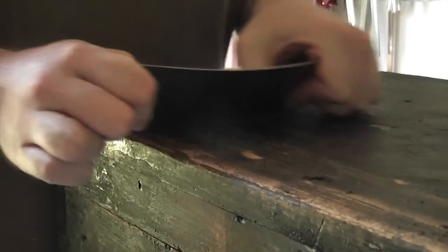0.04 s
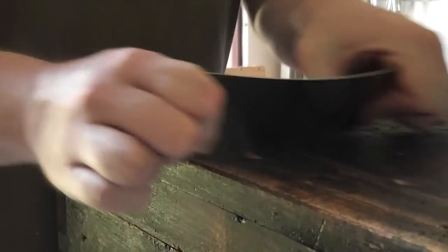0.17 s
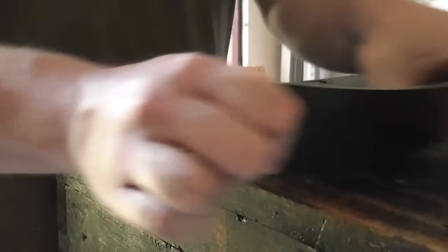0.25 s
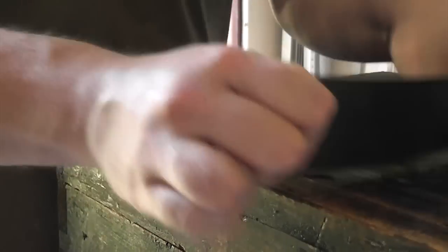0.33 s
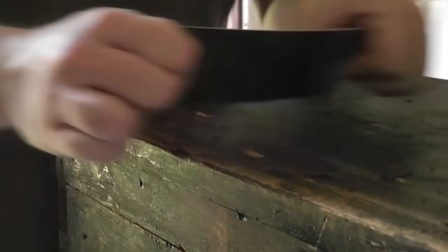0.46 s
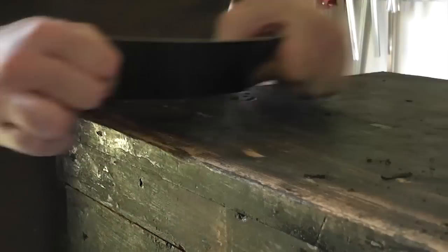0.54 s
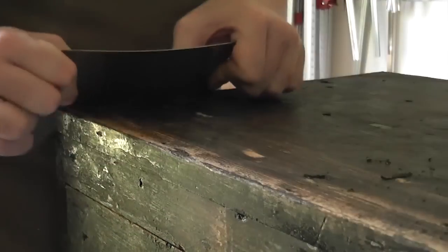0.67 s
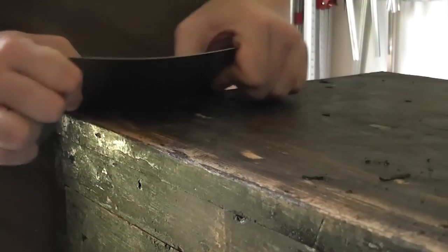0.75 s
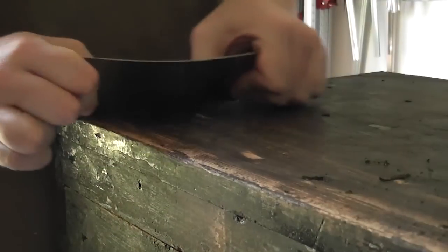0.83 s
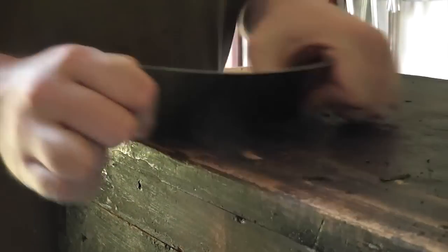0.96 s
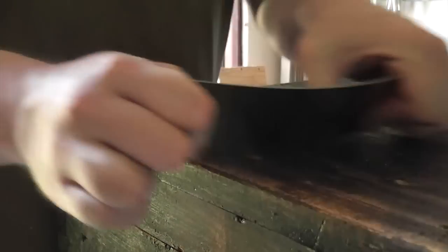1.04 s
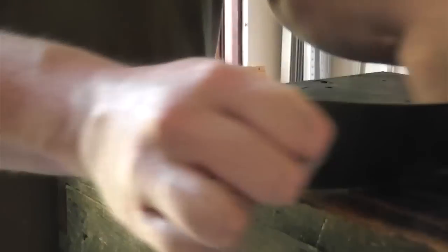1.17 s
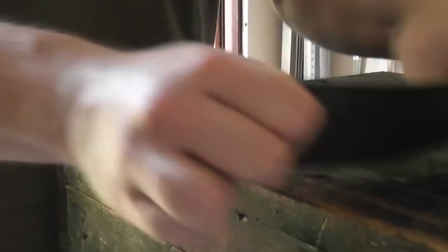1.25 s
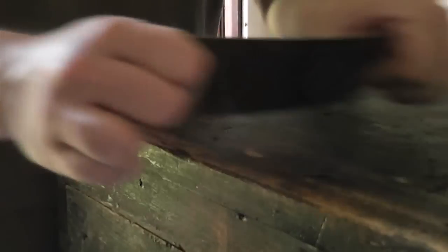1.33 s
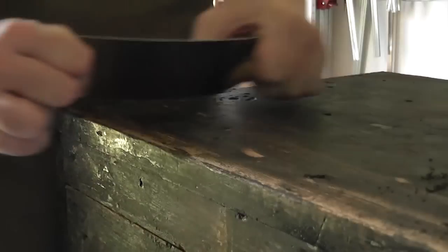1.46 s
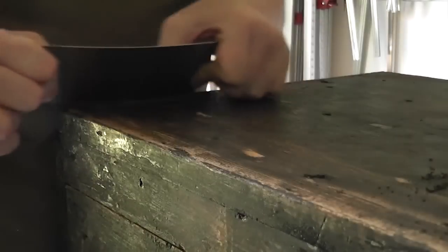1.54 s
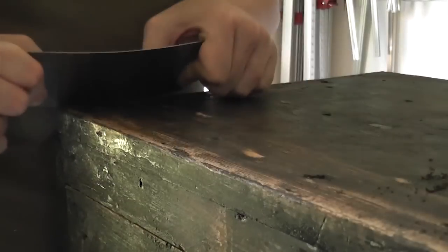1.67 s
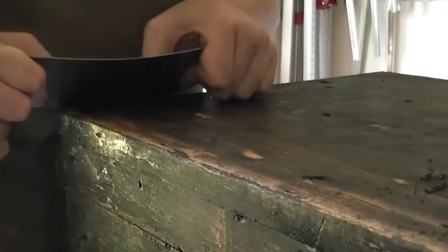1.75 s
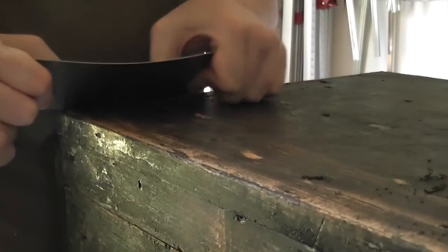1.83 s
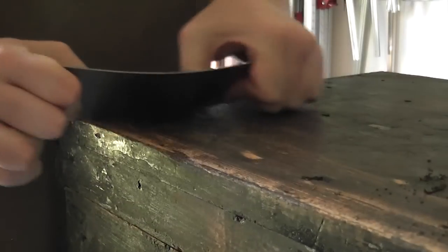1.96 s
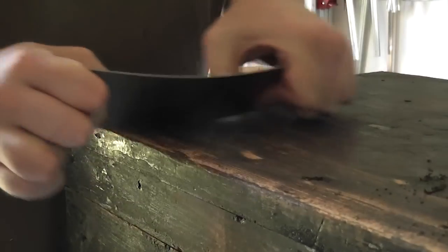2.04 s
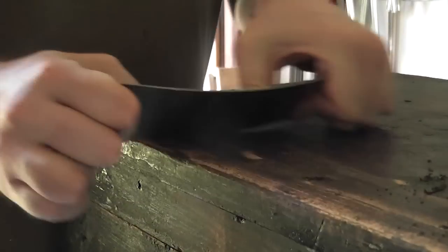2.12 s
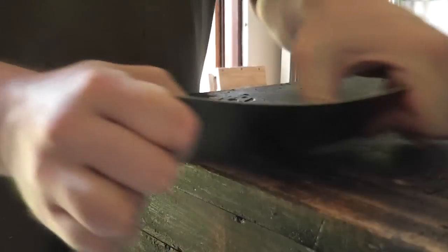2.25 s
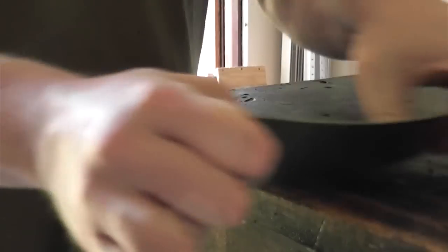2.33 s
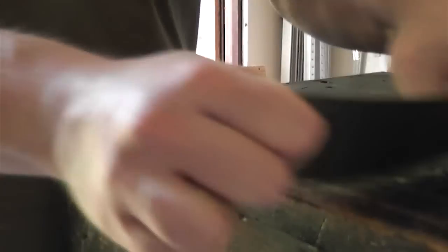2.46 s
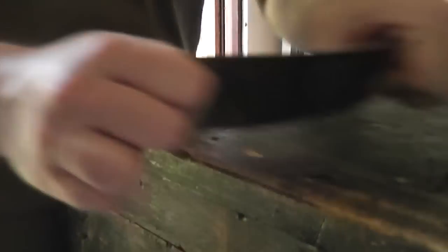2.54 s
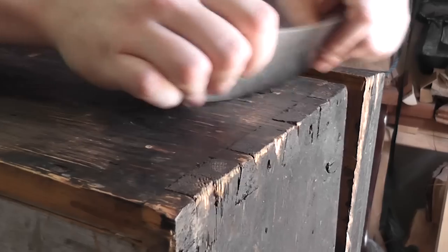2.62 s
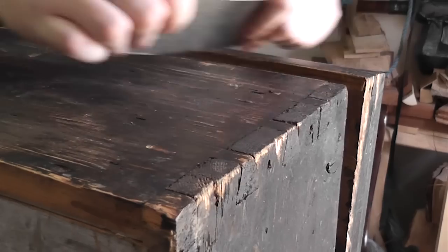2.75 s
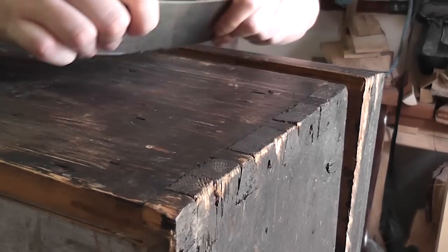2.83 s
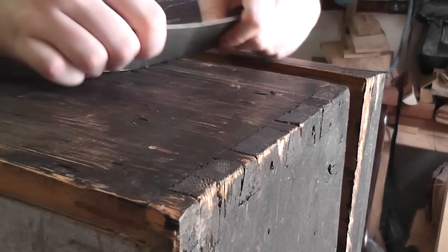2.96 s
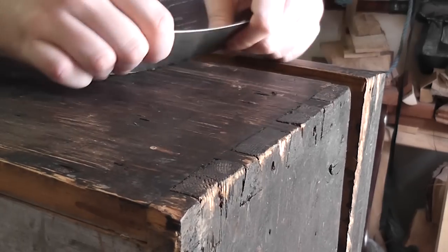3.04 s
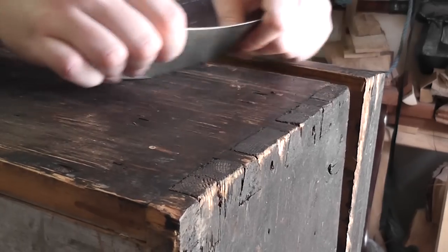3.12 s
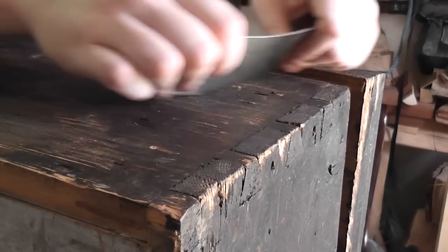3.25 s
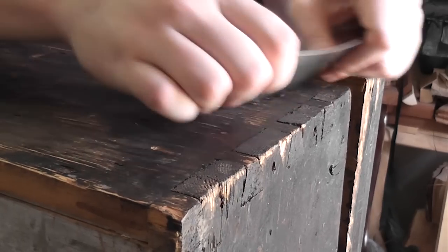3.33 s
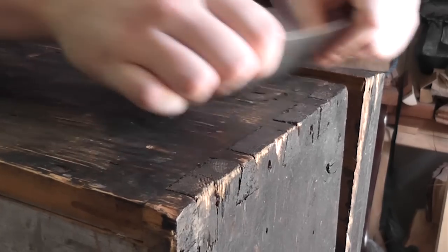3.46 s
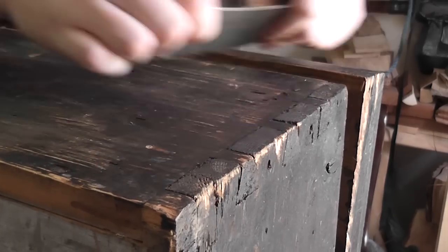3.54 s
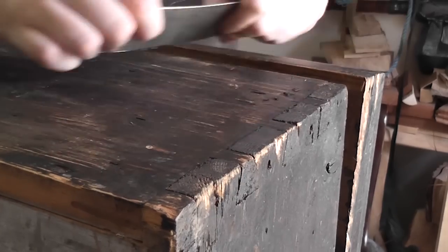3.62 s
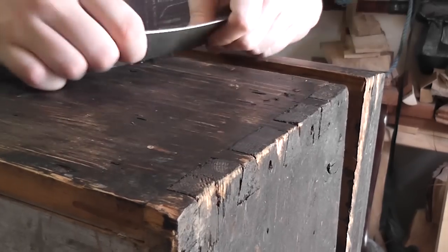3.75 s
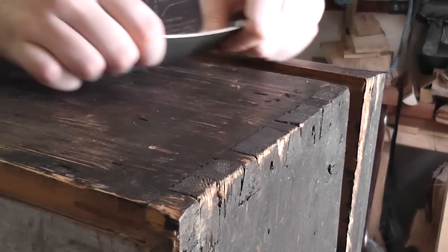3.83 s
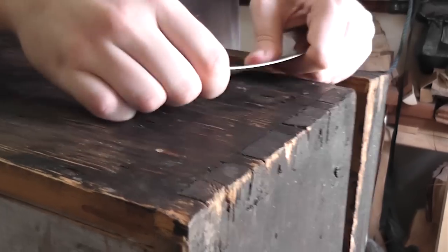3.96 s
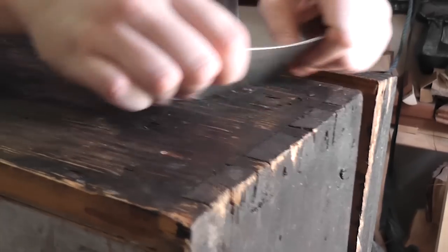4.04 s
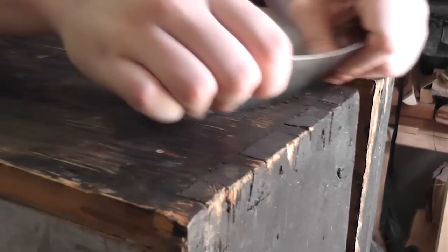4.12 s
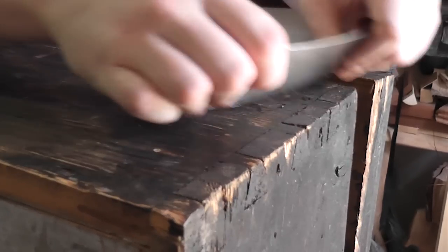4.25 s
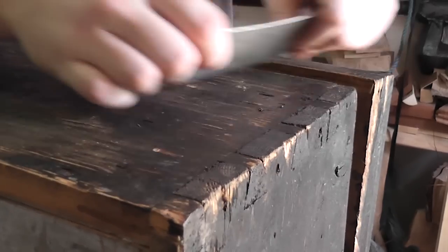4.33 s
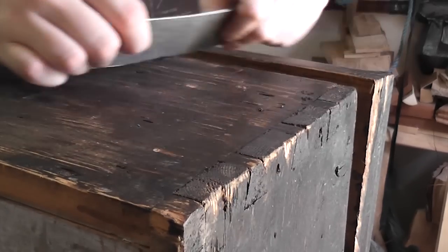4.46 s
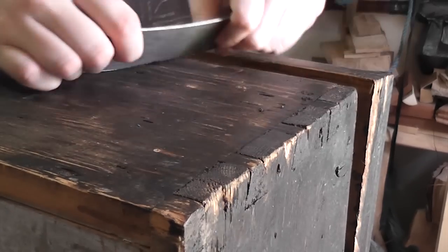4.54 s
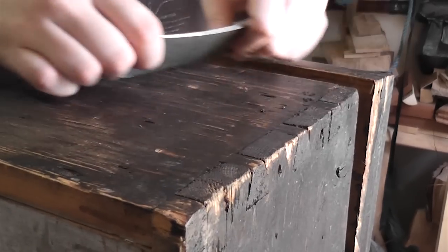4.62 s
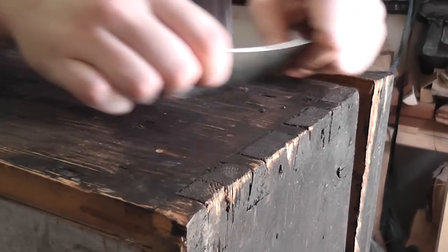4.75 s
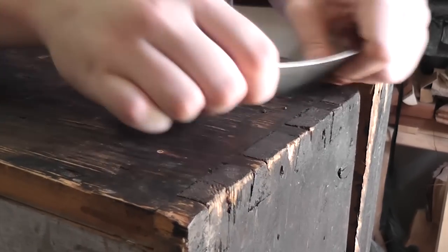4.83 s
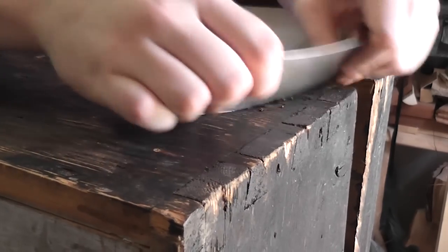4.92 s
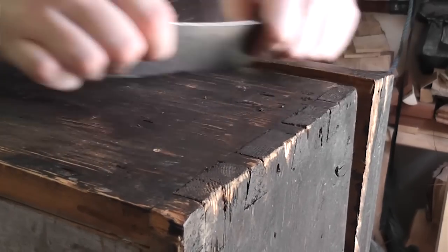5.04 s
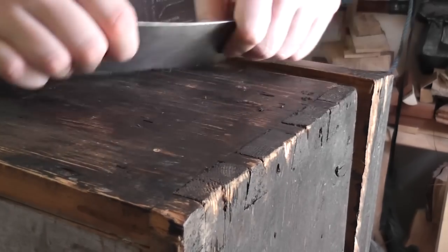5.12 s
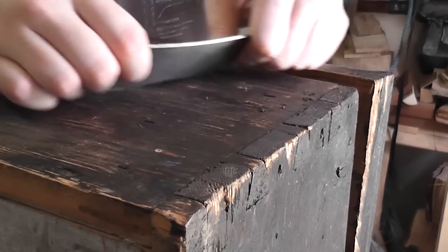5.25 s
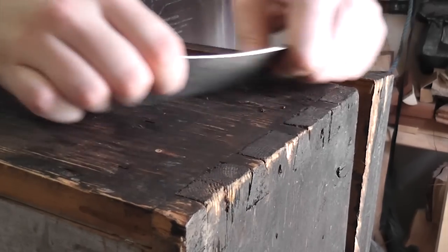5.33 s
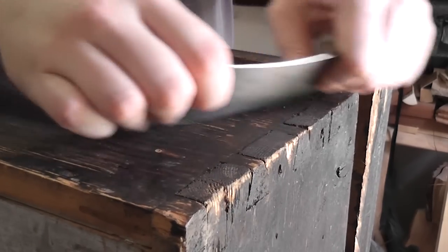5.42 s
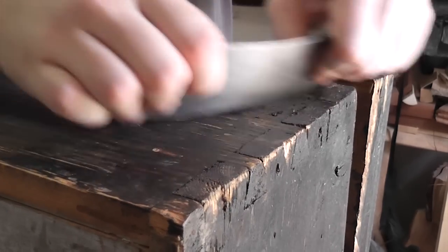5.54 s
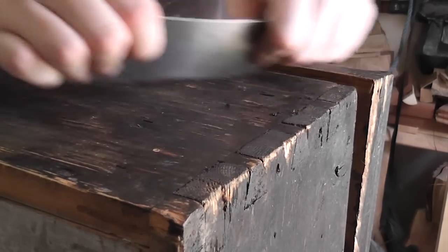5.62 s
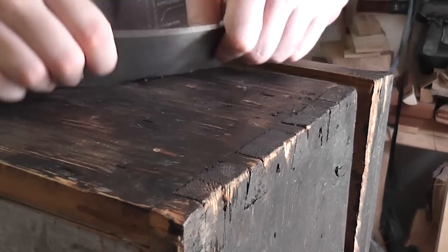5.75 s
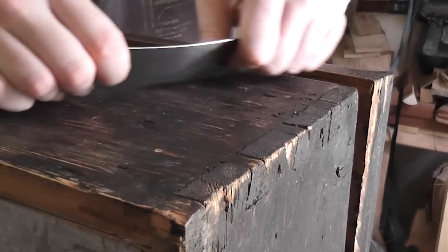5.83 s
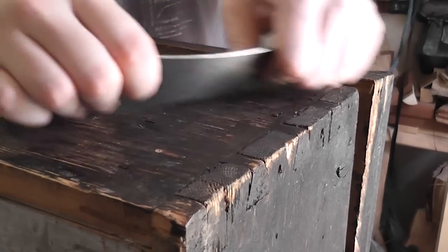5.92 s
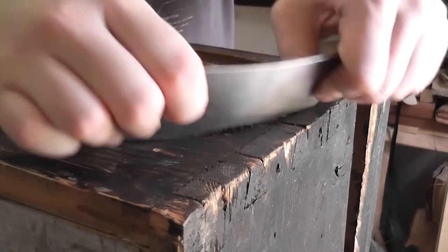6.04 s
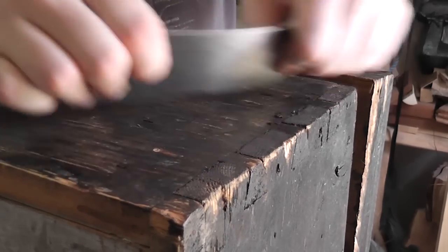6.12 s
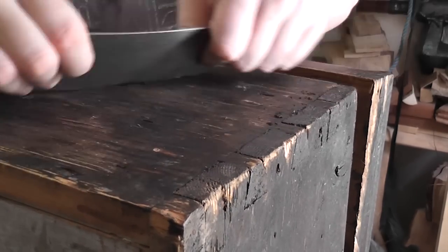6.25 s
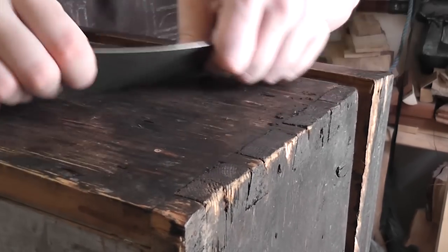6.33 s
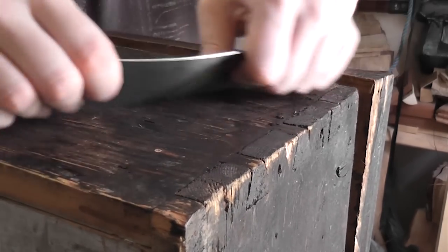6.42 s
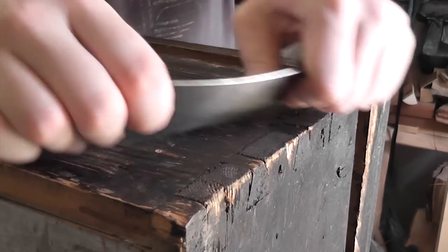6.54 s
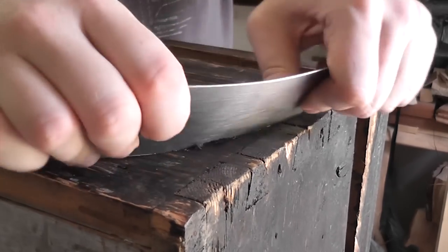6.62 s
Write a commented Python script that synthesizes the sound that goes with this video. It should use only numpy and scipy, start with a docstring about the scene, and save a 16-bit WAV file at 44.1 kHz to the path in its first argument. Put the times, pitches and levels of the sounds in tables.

```python
"""A bowed steel card scraper takes paint off a hollow wooden cabinet, close by in a workshop.
First, three long pushes over a steady distant rush: paint breaks off in dense tiny fractures, so
the edge hisses, the boards rasp and the box booms. Between strokes the blade knocks or skids, and
the cabinet thumps as the weight comes off. From 2.8 s it is heard from a second side, the rush
faint: a run of short strokes, knocks and skids, then three longer pushes."""
import sys
import numpy as np
from scipy import signal
from scipy.fft import rfft, irfft
from scipy.io import wavfile
from scipy.ndimage import uniform_filter1d

SR = 44100
rng = np.random.default_rng(int(sys.argv[2]) if len(sys.argv) > 2 else 0)


def dump(signal):
    """Clip the signal to [-1, 1] and save it as 16-bit WAV at the path in sys.argv[1]."""
    limited = np.clip(np.atleast_2d(signal).T, -1, 1)
    pcm = np.round(limited * 32767).astype(np.int16)
    wavfile.write(sys.argv[1], SR, pcm)


N = 294588
TIME_S = np.arange(N) / SR
RING_TIME_S = np.arange(SR // 2) / SR
SIDE_CHANGE_S = 2.8


def undb(db):
    return 10 ** (np.asarray(db) / 20)


def unit_rms(x):
    return x / np.sqrt(np.mean(x ** 2))


def decay(t, t60_s):
    return np.exp(-np.log(1000) * t / t60_s)


def shape(x, colour):
    """Minimum-phase filter through (f/Hz, gain/dB) points."""
    hz, db = np.transpose(colour)
    size = 4096
    grid_hz = np.maximum(np.fft.rfftfreq(size, 1 / SR), 1)
    gain = undb(np.interp(np.log(grid_hz), np.log(hz), db))
    cepstrum = irfft(np.log(gain))
    cepstrum[1:size // 2] *= 2
    cepstrum[size // 2 + 1:] = 0
    impulse = irfft(np.exp(rfft(cepstrum)))
    return signal.fftconvolve(x, impulse[None], axes=1)[:, :x.shape[1]]


def butter(x, hz, kind, order=2):
    return signal.sosfilt(signal.butter(order, hz, kind, fs=SR, output="sos"), x)


def split_bands(x, edges_hz):
    """Adjoining bands, low to high, that sum to x."""
    below = [signal.sosfiltfilt(signal.butter(4, hz, fs=SR, output="sos"), x) for hz in edges_hz]
    return np.diff([0 * x, *below, x], axis=0)


def level_out(x, span_s):
    """Unit RMS over each span; only the quick grain is left."""
    power = uniform_filter1d(np.mean(x ** 2, axis=0), int(span_s * SR))
    return x / np.sqrt(np.abs(power))


def drift(rate_hz):
    """Slewed random steps, unit RMS."""
    hold = int(SR / rate_hz)
    steps = rng.standard_normal(N)[np.arange(N) // hold]
    return unit_rms(uniform_filter1d(steps, hold))


def stereo_noise(n, width):
    """Mid/side noise, the side coloured by width."""
    mid, side = rng.standard_normal((2, 1, n))
    return mid + shape(side, width) * np.array([[1], [-1]])


# Stereo width of the air: f/Hz, side over mid/dB
AIR_SIDE = [(30, -11), (130, -16.5), (300, -12), (1000, -9), (2000, -6.5), (3500, -46), (6000, -40),
            (12000, -20)]
# Spectra of shop air and distant rush: f/Hz, relative level/dB
SHOP_COLOUR = [(20, -29), (50, 3.5), (150, 10), (400, -1), (1000, -2), (2000, -5), (4000, -10.5),
               (8000, -20.5), (12000, -25)]
RUSH_COLOUR = [(40, 1), (150, -2), (350, 8.5), (600, 11), (1000, 9), (1400, 1.5), (1900, -12), (2600, -75),
               (4000, -51), (12000, -36)]


def background(shop_db, rush_first_db, rush_later_db, fade_s):
    """Quiet workshop air and a broad distant rush, faint on the second side."""
    fade_span_s = [SIDE_CHANGE_S - fade_s / 2, SIDE_CHANGE_S + fade_s / 2]
    rush_db = np.interp(TIME_S, fade_span_s, [rush_first_db, rush_later_db])
    rush = unit_rms(shape(stereo_noise(N, AIR_SIDE), RUSH_COLOUR)) * undb(rush_db + .5 * drift(6.6))
    air = unit_rms(shape(stereo_noise(N, AIR_SIDE), SHOP_COLOUR)) * undb(shop_db + .5 * drift(3.6))
    return rush + air


# Stereo width of ringing wood: f/Hz, side over mid/dB
WOOD_SIDE = [(30, -6), (130, -28), (300, -10), (600, -10), (1300, -7.5), (2000, -36.5), (3000, -99.5),
             (12000, -52)]


def spot_ring(t60_s):
    """Dense board modes woken by a tap; each spot has its own mix."""
    t = RING_TIME_S[:SR // 6]
    return unit_rms(stereo_noise(len(t), WOOD_SIDE) * decay(t, t60_s)) / np.sqrt(len(t))


# Cabinet modes: f/Hz, relative level/dB, t60/s
BOX_MODES = [(132.2, 5.5, 0.39), (162.3, 2, 0.2), (182, 8.5, 0.23), (257.4, 12.5, 0.65), (289.9, 8.5, 0.14),
             (303.2, 7, 0.99), (329, 15, 0.39), (338, -7, .25), (399, 0.5, 0.49), (513, -13, 0.82),
             (561, 11, 0.29), (571, 1.5, 0.21), (620, 8.5, 0.35), (787, 5.5, 0.99), (800, 7, 0.2),
             (864, 2, 0.49), (940, -3, 0.41), (1018, 0, 0.41), (1072, -20, 0.35), (1100, 2, 0.1),
             (1310, 7, 0.28), (1203, 5, 0.057), (1290, -9, 0.11), (1560, -5.5, 0.02)]


def cabinet(direct_db, room_db, room_t60_s):
    """Impulse response: direct click, small dull room and clear box modes."""
    t = RING_TIME_S
    room = stereo_noise(len(t), WOOD_SIDE) * decay(t, room_t60_s) * (1 - decay(t, 0.15))
    ring = undb(room_db) * butter(unit_rms(room) / np.sqrt(len(t)), 1660, "low")
    ring[:, 0] += undb(direct_db)
    for hz, db, t60_s in BOX_MODES:
        amplitude = undb(db) * 2 * np.log(1000) / (t60_s * SR)
        ring += amplitude * decay(t, t60_s) * np.cos(2 * np.pi * hz * t)
    return ring


# Blade or hand lands: t/s, level/dB, contact corner/Hz (high is hard)
LANDINGS = [(0.094, -29.5, 494), (0.679, -20, 1130), (1.693, -33, 132), (2.409, -29, 460),
            (2.9292, -17, 1500), (3.460, -26, 910), (3.717, -42.5, 1000), (3.7659, -17.5, 1730),
            (4.152, -21.5, 990), (4.576, -17, 2070), (5.193, -23.5, 960), (5.762, -26, 640),
            (6.278, -29, 584)]
# Weight comes off, cabinet thumps: t/s, level/dB, contact corner/Hz
THUMPS = [(0.385, -41.5, 299.8), (1.287, -33, 200), (2.488, -25.5, 170), (2.679, -23, 332),
          (3.471, -21, 414), (4.165, -17.5, 380), (4.941, -22, 720), (5.593, -26, 507)]
# Colour of a blow: f/Hz, gain/dB
KNOCK_EQ = [(30, -39), (90, -15), (170, 1.5), (240, -7.5), (300, 2.5), (480, -1.5), (800, -1), (1250, -2.5),
            (1700, -9), (2550, -8), (3100, 1.5), (5000, -1), (12000, -11)]


def knocks(box, boards_db, walls_db, tick_db, settle_s):
    """Blows, each at its own spot; a softer contact leaves only the low modes."""
    out = np.zeros((2, N + SR))
    hardest_hz = max(corner_hz for _, _, corner_hz in LANDINGS)
    rock_s, rock_db, rock_hz = 0.041, -6, 155  # the box rocks back once after each thump
    rocking = [(at_s + rock_s, db + rock_db, rock_hz) for at_s, db, _ in THUMPS]
    for at_s, db, corner_hz in LANDINGS + THUMPS + rocking:
        boards = undb(boards_db) * spot_ring(t60_s=0.11)
        walls = undb(walls_db) * butter(spot_ring(t60_s=0.26), 610, "low")
        wood = np.pad(boards + walls, ((0, 0), (0, box.shape[1] - boards.shape[1])))
        hit = butter(shape(box + wood, KNOCK_EQ), corner_hz, "low", order=3)
        hit /= np.std(hit[:, :SR // 40])
        # a steel corner ticks first, the full weight follows
        hit = np.roll(hit, int(settle_s * SR), axis=1)
        tick = butter(spot_ring(t60_s=0.02), 890, "high")
        tick = butter(tick, 2100, "low", order=1)
        hit[:, :tick.shape[1]] += undb(tick_db) * (corner_hz / hardest_hz) ** 2 * tick
        start = int(at_s * SR)
        out[:, start:start + hit.shape[1]] += undb(db) * hit
    return out[:, :N]


def fractures(box, breaks_per_s, boards_db, boards_t60_s):
    """Continuous friction: tiny paint breaks of uneven size ring the wood."""
    breaks = (rng.random(N) < breaks_per_s / SR) * rng.standard_normal(N)
    force = (breaks * undb(-0.03 * drift(70)))[None]
    # the edge travels from spot to spot, shifting the fine colour
    shares = np.array([drift(9) for _ in range(8)])
    shares /= np.linalg.norm(shares, axis=0)
    boards = sum(share * signal.oaconvolve(force, spot_ring(boards_t60_s), axes=1)[:, :N]
                 for share in shares)
    # bass comes from the whole box, treble straight from the edge
    boards = butter(butter(boards, 274, "high"), 3100, "low", order=1)
    return signal.oaconvolve(force, box, axes=1)[:, :N] + undb(boards_db) * boards


# Edge catches: t/s, rasp level/dB, hiss level/dB, length/s, rasp corner/Hz
CATCHES = [(0.636, -46, -43.5, 0.099, 2000), (0.676, -27, -40.5, 0.03, 1560),
           (1.572, -70, -49, 0.069, 2000), (2.628, -40.5, -52, 0.025, 1500), (2.668, -29, -49.5, 0.05, 940),
           (3.491, -26.5, -62, 0.022, 1710), (3.6, -37, -44, 0.056, 1550), (4.022, -22.5, -53, 0.026, 1500),
           (4.296, -29, -52, 0.0091, 1550), (5.067, -19.5, -31, 0.068, 2500),
           (5.189, -29.5, -42.5, 0.038, 1340), (5.585, -29.5, -42, 0.047, 1350),
           (5.749, -23.5, -35, 0.051, 980), (6.276, -24, -30, 0.079, 1380)]
# Colour of a skid's rasp: f/Hz, gain/dB
SKID_EQ = [(60, -38), (170, -10), (330, -1.5), (600, 1), (900, -2.5), (1500, -1.5), (2200, 1), (2570, -5.5),
           (3200, -1), (5000, -9.5), (12000, -63)]


def skids(friction, hiss_eq, attack_s, hiss_hz):
    """The edge bites at once, judders and lets go; the hiss dies before the rasp."""
    wood = shape(friction, SKID_EQ)
    edge = unit_rms(butter(shape(friction, hiss_eq), hiss_hz, "high"))
    out = np.zeros((2, N))
    for at_s, rasp_db, hiss_db, length_s, corner_hz in CATCHES:
        start = int(at_s * SR)
        on = slice(start, start + SR // 4)
        t = TIME_S[on] - TIME_S[start]
        grip = (1 - np.exp(-t / attack_s)) / (1 + (t / length_s) ** 4)
        rasp = unit_rms(butter(wood[:, on], corner_hz, "low"))
        out[:, on] += undb(rasp_db) * grip * rasp + undb(hiss_db) * grip ** 2 * edge[:, on]
    return out


# Scraping colour on each side: f/Hz, gain/dB
FIRST_SIDE_EQ = [(50, -23.5), (130, -1.5), (310, 2.5), (440, -0.5), (900, 0.5), (1500, -3.5), (2300, -9),
                 (2560, -12.5), (2900, -10.5), (3700, -7), (4400, -10.5), (5600, -5.5), (7800, -9.5),
                 (11300, -6)]
SECOND_SIDE_EQ = [(50, -52), (170, 2), (235, -12), (310, 5.5), (440, 1), (1000, 4.5), (1900, -2),
                  (2350, -5.5), (2570, -9.5), (3100, -5.5), (4500, -7.5), (6500, -6), (8000, -8),
                  (11300, -4.5)]
# Pushes and light return drags: t/s, length/s, rise/s, fall/s, relative hiss, rasp, boom levels/dB
BLADE_STROKES = [ (-0.1, 0.52, 0.17, 0.075, -21.5, -31.5, -25), (0.772, 0.55, 0.21, 0.084, -22, -29.5, -29),
                 (1.803, 0.27, 0.11, 0.13, -34, -28.5, -28.5), (1.969, 0.56, 0.15, 0.11, -22.5, -29, -27.5),
                 (3.002, 0.064, 0.034, 0.021, -41.5, -41, -31.5),
                 (3.067, 0.15, 0.015, 0.065, -39.5, -36, -28.5), (3.165, 0.32, 0.016, 0.12, -27, -27, -26),
                 (3.467, 0.18, 0.013, 0.17, -48, -35, -34.5), (3.837, 0.29, 0.091, 0.13, -28, -34, -32),
                 (4.074, 0.16, 0.029, 0.084, -25.5, -25.5, -28),
                 (4.194, 0.23, 0.03, 0.17, -41, -33.5, -33.5), (4.381, 0.16, 0.014, 0.048, -46.5, -47, -49),
                 (4.617, 0.3, 0.28, 0.061, -23, -31, -32), (4.866, 0.19, 0.048, 0.13, -36, -31, -33.5),
                 (5.256, 0.34, 0.2, 0.12, -22, -29, -33), (5.848, 0.31, 0.054, 0.14, -23, -29, -33.5),
                 (6.387, 0.45, 0.076, 0.29, -23.5, -26, -35.5), ]


def strokes(friction, rows, side_eq, bite_offset_db, gain_db):
    """The blade speeds up, runs and slows; the hiss follows speed closely, the wood less."""
    start_power, stop_power = 0.95, 1.66
    speed_powers = 0.36, 0.7, 0.79, 1.09  # boom, rasp, bite, hiss
    arm_arch_db, weight_shift_db = 1, 3.5
    bands = split_bands(shape(friction, side_eq), edges_hz=[500, 1700, 3500])
    bands = [undb(gain_db) * level_out(band, span_s=0.17) for band in bands]
    out = np.zeros((2, N))
    for at_s, length_s, rise_s, fall_s, hiss_db, rasp_db, boom_db in rows:
        on = (TIME_S > at_s) & (TIME_S < at_s + length_s)
        t = TIME_S[on] - at_s
        from_middle = t / length_s - .5
        speed = np.minimum(t / rise_s, 1) ** start_power
        speed *= np.minimum((length_s - t) / fall_s, 1) ** stop_power
        speed *= undb(-arm_arch_db * (2 * from_middle) ** 2)  # the arm is slower at either end
        # the weight shifts: rasp grows, boom eases
        rasp_db = rasp_db + weight_shift_db * from_middle
        boom_db = boom_db - weight_shift_db * from_middle
        bite_db = (hiss_db + rasp_db) / 2 + bite_offset_db  # needs both pressure and speed
        for band, db, power in zip(bands, (boom_db, rasp_db, bite_db, hiss_db), speed_powers):
            out[:, on] += band[:, on] * undb(db) * speed ** power
    return out


def scene():
    """Knocks, skids and strokes sound through one cabinet, over the shop air."""
    box = cabinet(direct_db=-2.5, room_db=-4.5, room_t60_s=0.4)
    friction = fractures(box, breaks_per_s=9000, boards_db=2, boards_t60_s=0.042)
    first = [row for row in BLADE_STROKES if row[0] < SIDE_CHANGE_S]
    later = [row for row in BLADE_STROKES if row[0] >= SIDE_CHANGE_S]
    mix = background(shop_db=-46, rush_first_db=-40.5, rush_later_db=-50.5, fade_s=0.38)
    mix += knocks(box, boards_db=3.5, walls_db=2.5, tick_db=22, settle_s=0.001207)
    mix += skids(friction, SECOND_SIDE_EQ, attack_s=0.0019, hiss_hz=3600)
    mix += strokes(friction, first, FIRST_SIDE_EQ, bite_offset_db=-2.5, gain_db=-1.8)
    mix += strokes(friction, later, SECOND_SIDE_EQ, bite_offset_db=-2, gain_db=-0.35)
    return mix


def record(dry):
    """Steep low-pass at 12 kHz."""
    return signal.sosfilt(signal.ellip(12, .2, 80, 12000, fs=SR, output="sos"), dry)


dry = scene()
out = record(dry)
dump(out)
```